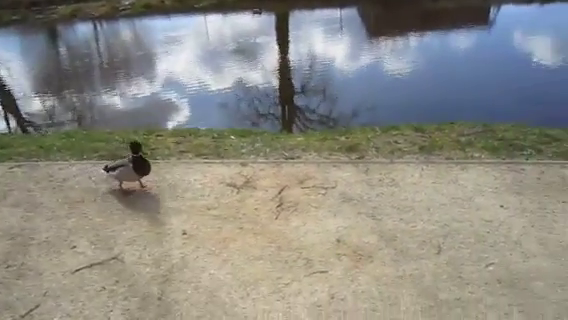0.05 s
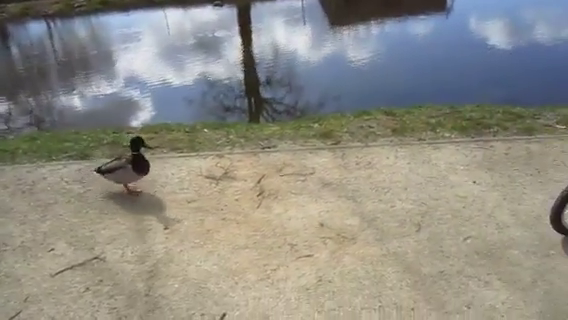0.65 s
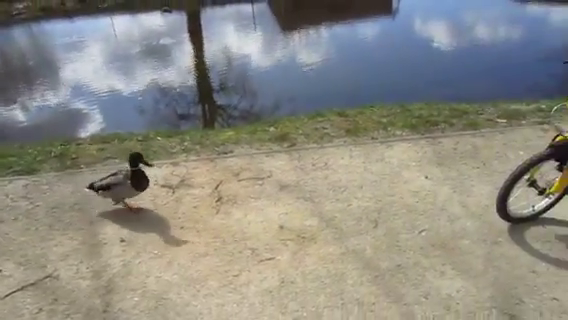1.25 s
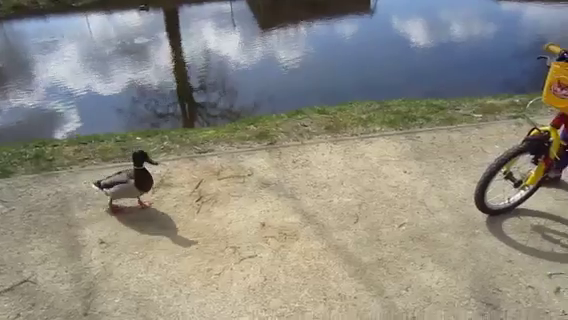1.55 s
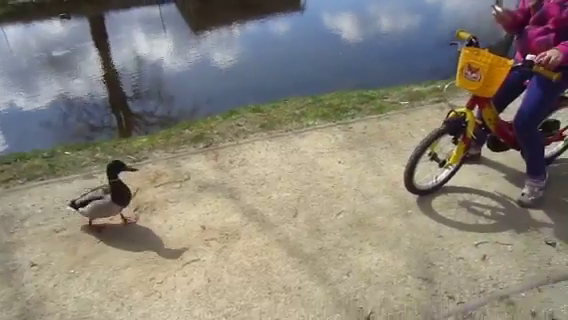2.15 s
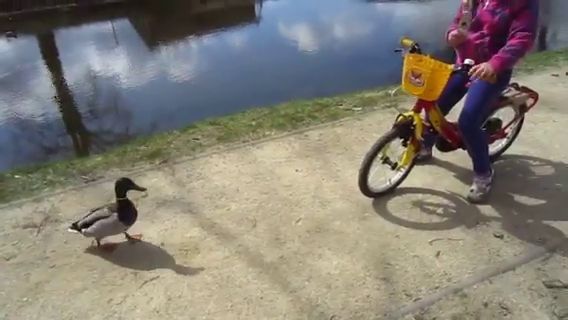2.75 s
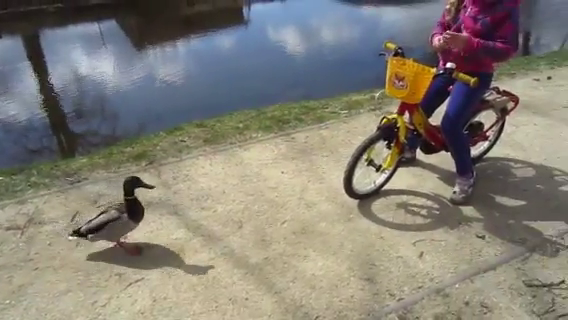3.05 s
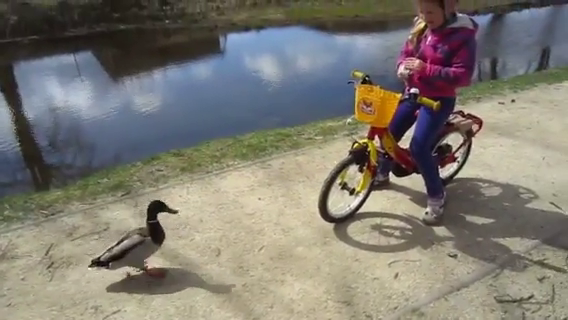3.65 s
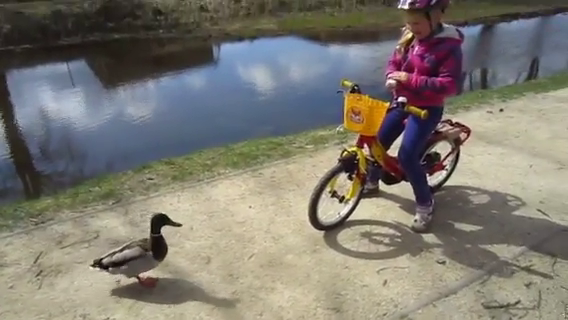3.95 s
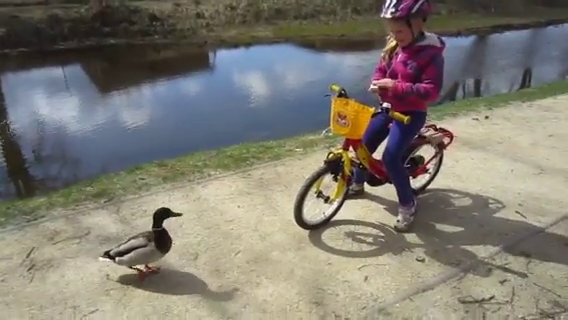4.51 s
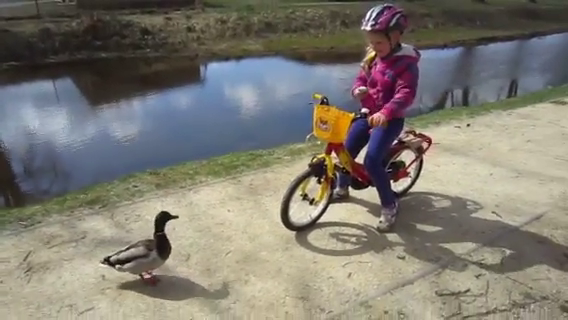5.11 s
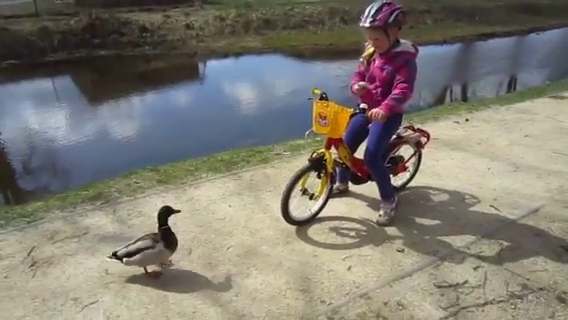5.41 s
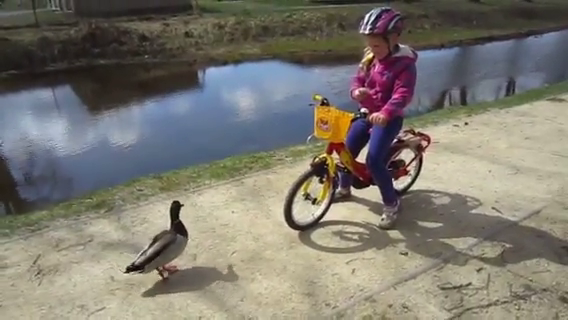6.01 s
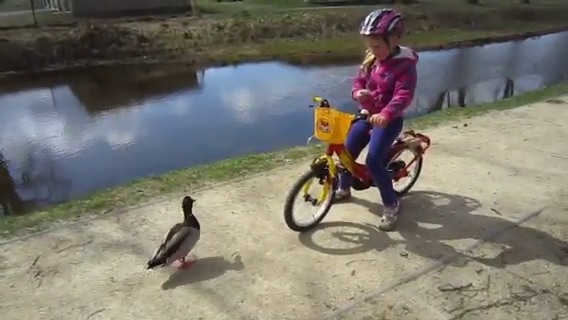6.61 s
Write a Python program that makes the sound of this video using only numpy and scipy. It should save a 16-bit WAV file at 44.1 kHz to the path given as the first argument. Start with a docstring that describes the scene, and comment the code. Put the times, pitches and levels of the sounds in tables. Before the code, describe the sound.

Outdoors beside a canal, loud, uneven gusts hit the microphone directly, rumbling and thumping with occasional cracks and brief hollow hoots. After a second or so, a nearby duck starts giving soft, short, raspy quacks, much quieter than the wind. Faint whistles and chirps come from distant birds. The quacks stop and the gusts briefly thin out before returning at the end.

```python
"""Mallard drake on a windy canal path

A drake gives short, soft, raspy quacks a few metres away: puffs of his syrinx ringing his windpipe.
Gusty wind buffets the microphone, far louder than he is: rumble, flutter, thumps, a few sharp cracks
and hollow hoots. Small birds whistle and chirp across the water, over a faint outdoor hush that
swells near the end."""
import sys
import numpy as np
from scipy import signal
from scipy.fft import rfft, irfft, next_fast_len
from scipy.io import wavfile
from scipy.ndimage import uniform_filter1d, map_coordinates

SR = 44100
rng = np.random.default_rng(int(sys.argv[2]) if len(sys.argv) > 2 else 0)


def to_wav(s):
    """Save 16-bit WAV."""
    ch = np.atleast_2d(s).T  # columns
    pcm = np.round(np.clip(ch, -1, 1) * 32767)  # PCM
    wavfile.write(sys.argv[1], SR, pcm.astype(np.int16))


N = 302967


def amp(db):
    """Decibels to gain."""
    return 10 ** (np.asarray(db) / 20)


def unit(x):
    """Scale to rms 1."""
    return x / np.sqrt(np.mean(x ** 2) + 1e-20)


def along(points, hz):
    """Read (freq_hz, value) points on a log frequency axis."""
    freqs, values = np.transpose(points)
    return np.interp(np.log(hz + 1), np.log(freqs), values)


def automation(rows):
    """One per-sample curve for each column after the time."""
    times, *columns = np.transpose(rows)
    return [np.interp(np.arange(N) / SR, times, column) for column in columns]


def wobble(rate_hz):
    """A smooth random curve with rate_hz knots a second."""
    return map_coordinates(rng.standard_normal(N // 8), [np.arange(N) * rate_hz / SR], mode="wrap")


def filtered(x, response):
    """Filter by a gain that is a function of frequency."""
    size = next_fast_len(N + SR // 2)
    return irfft(rfft(x, size) * response(np.fft.rfftfreq(size, 1 / SR)), size)[:N]


def coloured(x, spectrum):
    """EQ by a spectrum's shape; white input keeps its power."""
    return filtered(x, lambda hz: unit(amp(along(spectrum, hz))))


def noise(spectrum):
    """Coloured noise of rms 1."""
    return unit(coloured(rng.standard_normal(N), spectrum))


def add(track, start_s, sound):
    """Mix a sound into the track."""
    start = int(np.clip(round(start_s * SR), 0, N - 1))
    track[start:start + len(sound)] += sound[:N - start]


def eddies(spectrum, burst_db, steady_s):
    """Turbulence of one eddy size: it comes in bursts, while its power over steady_s stays near 1."""
    turbulence = coloured(rng.standard_normal(N) * amp(burst_db), spectrum)
    window = max(int(steady_s * SR), 1)
    power = uniform_filter1d(uniform_filter1d(turbulence ** 2, window), window)
    return turbulence / np.sqrt(np.abs(power) + 1e-12)


def gust(length_s, attack_s=.011, release_s=.012):
    """One gust's envelope: attack, hold, release."""
    t = np.arange(SR) / SR
    return np.minimum(t / attack_s, 1) * np.exp(-np.maximum(t - length_s, 0) / release_s)


# the light breeze between gusts: time_s, strength_db
BREEZE = [(0, -25.5), (1.4, -34), (2.2, -40), (3.25, -45.5), (4.5, -36.5), (5.05, -51), (6.05, -59),
          (6.3, -41.5), (6.87, -39)]
# gusts on the microphone: start_s, length_s, strength_db, rumble_offset_db, rasp_offset_db
GUSTS = [(0.01, 0.064, -24, 4.5, -12.5), (0.127, 0.053, -28, 0.5, -10), (0.222, 0.068, -19, 2.5, -13),
         (0.303, 0.13, -25, -4, -8.5), (0.438, 0.093, -20.5, 0.5, -13), (0.541, 0.326, -24, 1, -9.5),
         (0.875, 0.12, -26.5, -5, -5.5), (1.0, 0.19, -25.5, -6.5, -9.5), (1.215, 0.22, -31.5, 2.5, -15.5),
         (1.458, 0.12, -21, 2.5, -13), (1.575, 0.22, -24, 1.5, -15), (1.887, 0.087, -22.5, 3, -17),
         (2.016, 0.11, -23, -4, -17.5), (2.264, 0.015, -26, 1.5, -34), (2.34, 0.13, -21.5, -1, -20),
         (2.459, 0.1, -23, -6, -24.5), (2.619, 0.03, -15.5, -4.5, -21), (2.692, 0.16, -22, -3.5, -14.5),
         (2.858, 0.078, -28.5, -1.5, -10), (3.003, 0.15, -26.5, 1.5, -13), (3.346, 0.15, -27, -3, -22),
         (3.478, 0.026, -20, -0.5, -14), (3.535, 0.062, -22.5, -10.5, -21.5),
         (3.718, 0.13, -24.5, -0.5, -14), (3.864, 0.1, -29, -4, -21.5), (4.011, 0.069, -22.5, -2.5, -14.5),
         (4.101, 0.1, -28, -1, -28.5), (4.244, 0.11, -24, -0.5, -15.5), (4.39, 0.09, -29.5, 4.5, -20),
         (4.488, 0.072, -28.5, 10, -21), (4.59, 0.17, -33, 0, -15), (4.776, 0.025, -22, 5, -16),
         (4.836, 0.06, -34, 2, -34), (5.146, 0.15, -29, 1, -23.5), (5.341, 0.066, -38, 3.5, -38),
         (5.572, 0.045, -41, 6, -28), (5.722, 0.07, -31.5, 8, -15), (5.793, 0.1, -29.5, 8.5, -12),
         (5.928, 0.013, -29, 10.5, -14), (6.223, 0.021, -40, 13, -15), (6.351, 0.025, -24, 5, -20),
         (6.446, 0.099, -25, 4, -32), (6.632, 0.14, -26.5, 6, -19), (6.771, 0.08, -28.5, 1.5, -22)]
def airflow(usual_db=-47.5, usual_rumble_db=-37, rumble_growth=.6, breeze_rasp_offset_db=-19.5):
    """Levels in dB of large, middle and small eddies: gusts add their power to a wavering breeze."""
    breeze_db = automation(BREEZE)[0] + 4 * wobble(rate_hz=24)
    rumble_db = usual_rumble_db + rumble_growth * (breeze_db - usual_db)
    large, middle, small = amp([rumble_db, breeze_db, breeze_db + breeze_rasp_offset_db]) ** 2
    for start_s, length_s, db, rumble_offset_db, rasp_offset_db in GUSTS:
        add(large, start_s, (amp(db + rumble_offset_db) * gust(length_s, release_s=.013)) ** 2)
        add(middle, start_s, (amp(db) * gust(length_s)) ** 2)
        add(small, start_s, (amp(db + rasp_offset_db) * gust(length_s)) ** 2)
    return 10 * np.log10([large, middle, small])


# tone of the eddies, largest to finest: freq_hz, gain_db
RUMBLE_EQ = [(10, -23.5), (25, -7.5), (45, -3.5), (90, 0), (150, -1.5), (220, -7.5), (350, -25),
             (700, -86.5)]
FLUTTER_EQ = [(60, -34.5), (140, -2), (220, 3), (350, -0.5), (500, -7), (700, -17.5), (1000, -36),
              (2000, -79.5)]
RASP_EQ = [(250, -23.5), (550, 7), (800, 4.5), (1200, -4.5), (2000, -22.5), (3000, -41.5), (5000, -67.5)]
CRACKLE_EQ = [(700, -19.5), (1500, 10), (2400, -2), (3000, -9.5), (4000, -23), (6000, -39), (12000, -69)]
def wind(crowding_from_db=-41, crowding=.28, crackle_growth=3):
    """Eddies of three sizes come in partly shared bursts; hard gusts break them into a fine crackle."""
    large_db, middle_db, small_db = airflow()
    bursts = unit(wobble(60) + 1.51 * wobble(220))
    flaps = unit(bursts + .48 * wobble(260))
    # in a hard gust the flaps crowd together, so each stands out less
    flaps *= amp(-crowding * np.maximum(small_db - crowding_from_db, 0))
    rumble = amp(large_db) * eddies(RUMBLE_EQ, 2 * bursts, steady_s=.076)
    flutter = amp(middle_db) * eddies(FLUTTER_EQ, 5.9 * bursts, steady_s=.046)
    rasp = amp(small_db) * eddies(RASP_EQ, 7 * flaps, steady_s=.066)
    crackle_db = -49.5 + crackle_growth * (small_db + 35)
    crackle = amp(crackle_db) * eddies(CRACKLE_EQ, 11 * flaps, steady_s=.022)
    return rumble + flutter + rasp + crackle


# fader moves of the outdoor bed: time_s, hum_db, hiss_db
HUSH_LEVELS = [(0, -61.5, -80.5), (5.0, -64.5, -79), (5.6, -61.5, -76.5), (6.05, -56.5, -75),
               (6.65, -57, -71.5), (6.87, -60, -76)]
# tone of its two layers: freq_hz, gain_db
HUM_EQ = [(30, 8.5), (150, 8), (400, -3.5), (1000, 1.5), (2000, -5), (3000, -9.5), (4200, -16), (6000, -32),
          (12000, -50.5)]
HISS_EQ = [(1000, -8.5), (3500, 1), (6500, -0.5), (9000, -3.5), (12000, -6.5), (15000, -7)]
def hush():
    """Distant hum and a thin hiss of air in grass and branches."""
    hum_db, hiss_db = automation(HUSH_LEVELS)
    hum = amp(hum_db + .28 * wobble(20)) * noise(HUM_EQ)
    return hum + amp(hiss_db) * noise(HISS_EQ)


# the strongest single eddies on the microphone port: centre_s, thud_db, edge_db
THUMPS = [(0.043, -11.5, -42), (.27, -19.5, -21.5), (.381, -14, -23.5), (.443, -11.5, -16.5),
          (0.477, -19, -22), (.508, -14.5, -19.5), (0.583, -18, -18.5), (.713, -11, -16), (.804, -17, -20),
          (0.856, -10.5, -26), (.936, -8.5, -16.5), (1.183, -14, -25.5), (1.469, -18.5, -47.5),
          (1.549, -20, -26.5), (1.794, -7.5, -22), (2.029, -6, -24.5), (2.046, -11, -24),
          (2.096, -7, -34.5), (2.354, -8, -37), (2.438, -6, -37), (2.442, -4, -22), (2.494, -13, -39.5),
          (2.63, -9, -44), (2.695, -8, -29), (2.768, -13, -22.5), (2.846, -12, -27.5), (2.985, -29, -34),
          (3.097, -6.5, -26.5), (3.5, -9.5, -28), (3.766, -13.5, -41), (3.83, -10, -35.5),
          (4.05, -10.5, -25), (4.071, -13.5, -31.5), (4.253, -17.5, -33), (4.279, -10, -31),
          (4.4, -14, -36.5), (4.723, -16.5, -36), (4.783, -3.5, -19.5), (5.263, -14.5, -40),
          (5.832, -23.5, -30.5), (5.934, -15.5, -31.5), (6.362, -15.5, -40), (6.65, -13, -44),
          (6.71, -9.5, -38.5), (6.741, -11, -40)]
# tone of their sharp edge: freq_hz, gain_db
EDGE_EQ = [(300, -24.5), (650, 1.5), (1000, 6.5), (1500, -5), (2600, -15.5), (4000, -33), (6000, -51.5),
           (12000, -79.5)]
def thumps(base_hz=535, width_cycles=.5, db_per_octave=45, edge_s=.0012):
    """An eddy crossing the port pushes, then pulls; a fast one is higher and tears off a sharp edge."""
    thuds, edges = np.zeros(N), np.zeros(N)
    t = np.arange(-SR // 50, SR // 50) / SR
    for centre_s, thud_db, edge_db in THUMPS:
        octaves = (edge_db - thud_db) / db_per_octave + rng.normal(0, .17)
        cycles = t * base_hz * 2 ** octaves
        push_pull = np.sin(2 * np.pi * cycles) * np.exp(-(cycles / width_cycles) ** 2)
        add(thuds, centre_s + t[0], rng.choice([-1, 1]) * amp(thud_db) * push_pull)
        add(edges, centre_s + t[0], amp(edge_db) * np.exp(-(t / edge_s) ** 2))
    return thuds + edges * eddies(EDGE_EQ, burst_db=0, steady_s=.0074)


# wind cracks: start_s, peak_db
CRACKS = [(.05, -33.5), (0.508, -28.5), (0.631, -31), (.637, -34), (.943, -34.5), (1.794, -33),
          (2.443, -28), (4.782, -44.5)]
# their bright tone: freq_hz, gain_db
CRACK_EQ = [(300, -14.5), (1500, 0), (4000, 2), (8000, -11.5), (14000, -18), (16000, -29.5)]
def cracks():
    """The hardest blows overload the capsule for an instant, each heard as one bright spike."""
    spikes, unit_spike = np.zeros(N), np.zeros(N)
    for start_s, peak_db in CRACKS:
        add(spikes, start_s, amp([peak_db]))
    unit_spike[N // 2] = 1
    return coloured(spikes, CRACK_EQ) / coloured(unit_spike, CRACK_EQ).max()


def tone(hz, waver):
    """A sine of rms 1 whose pitch strays by the fraction waver; a deep waver makes it hoarse."""
    drift = unit(uniform_filter1d(rng.standard_normal(SR // 2), size=90))[:len(hz)]
    return np.sqrt(2) * np.sin(2 * np.pi * np.cumsum(hz * (1 + waver * drift)) / SR)


# one bird's repeated long whistle: start_s, length_s, top_pitch_hz, level_db
WHISTLES = [(0.619, .23, 3120, -65.5), (1.877, 0.28, 3047, -58), (2.759, .3, 3063, -67),
            (3.776, 0.24, 3000, -63), (5.941, .26, 3040, -60.5)]
# contour of each whistle: length_fraction, pitch_ratio, gain_db
WHISTLE_CONTOUR = [(0, .87, -11), (.25, .95, -8), (.42, .988, -1), (.62, 1, 0), (.82, .99, 0),
                   (.93, .978, -4), (1, .91, -14)]
def whistler(upper_ratio=1.165, upper_db=-17, hoarseness=.066):
    """A whistle starts hoarse, slides up and clears; the syrinx's other side adds a weak higher note."""
    out = np.zeros(N)
    fractions, pitch_ratios, gains_db = np.transpose(WHISTLE_CONTOUR)
    for start_s, length_s, top_pitch_hz, level_db in WHISTLES:
        progress = np.linspace(0, 1, int(length_s * SR))
        hz = top_pitch_hz * np.interp(progress, fractions, pitch_ratios)
        waver = .0032 + hoarseness * np.clip(1 - progress / .56, 0, 1)
        voices = tone(hz, waver) + amp(upper_db) * tone(hz * upper_ratio, waver)
        add(out, start_s, amp(level_db + np.interp(progress, fractions, gains_db)) * voices)
    return out


# small birds' chirps: start_s, length_s, start_hz, middle_hz, end_hz, level_db
CHIRPS = [(1.339, .11, 4520, 4100, 4100, -72), (1.432, 0.064, 3310, 3700, 3330, -70),
          (1.686, 0.039, 3320, 3670, 3950, -68), (1.893, 0.066, 3520, 3870, 4130, -65.5),
          (3.87, 0.028, 5900, 6300, 6400, -69.5), (3.998, 0.035, 6330, 6020, 6000, -71),
          (4.005, 0.017, 5100, 4780, 4700, -68.5), (4.168, 0.036, 5950, 6350, 6400, -70),
          (4.278, 0.029, 4820, 4750, 4850, -66.5), (4.531, .055, 3210, 3780, 4380, -67.5),
          (4.553, 0.084, 5250, 5150, 5200, -74), (4.663, 0.023, 3680, 4200, 4420, -69),
          (5.261, 0.069, 3550, 3400, 2800, -73), (5.332, 0.072, 3700, 3830, 3900, -68.5),
          (6.541, 0.036, 2960, 3400, 3020, -60)]
def chirpers():
    """Small birds sing short glides, each a smooth arc through three pitches."""
    out = np.zeros(N)
    for start_s, length_s, *pitches_hz, level_db in CHIRPS:
        progress = np.linspace(0, 1, int(length_s * SR))
        arc_hz = np.polyval(np.polyfit([0, .5, 1], pitches_hz, 2), progress)
        add(out, start_s, amp(level_db) * np.sin(np.pi * progress) * tone(arc_hz, waver=.012))
    return out


# the drake's quacks: start_s, length_s, puff_rate_hz, level_db
QUACKS = [(1.355, .065, 92, -64), (1.64, .06, 92, -62), (2.301, .055, 88, -56), (2.551, .056, 92, -57),
          (3.325, .065, 90, -64), (3.572, .055, 92, -62), (4.122, .06, 92, -60), (4.366, .056, 95, -56),
          (4.62, .052, 85, -55.5), (5.475, .05, 90, -66)]
# tone of his syrinx and bill: freq_hz, gain_db
BILL_EQ = [(500, -20), (1100, -3), (1850, 0), (2600, 0), (3400, -5), (4100, -16), (5600, -17), (8000, -32)]
def drake(windpipe_hz=372, reflection=.65, puff_rise_s=.0012, jitter_s=.00017):
    """Each quack is a handful of slow, noisy puffs of the syrinx ringing the long windpipe."""
    puffs, t = np.zeros(N), np.arange(SR // 50) / SR
    for start_s, length_s, rate_hz, level_db in QUACKS:
        for onset_s in np.arange(.5 / rate_hz, length_s, 1 / rate_hz):
            puff = rng.standard_normal(len(t)) * t * np.exp(-t / puff_rise_s)
            puff *= np.sqrt(SR / rate_hz) / np.linalg.norm(puff)  # rms 1 over one period
            swell = np.sin(np.pi * onset_s / length_s) * amp(level_db + rng.normal(0, 1))
            add(puffs, start_s + onset_s + rng.normal(0, jitter_s), swell * puff)

    def windpipe(hz):
        """Closed at one end, reflecting at the open one, it rings at odd multiples of its lowest mode."""
        round_trip = reflection * np.exp(-1j * np.pi * hz / windpipe_hz)
        return np.sqrt(1 - reflection ** 2) / (1 + round_trip)

    return coloured(filtered(puffs, windpipe), BILL_EQ)


# hollow hoots of the port: start_s, length_s, level_db
HOOTS = [(3.348, .07, -37), (3.52, .1, -31), (4.848, 0.06, -40)]
# the port's resonance: freq_hz, gain_db
HOOT_EQ = [(250, -29), (400, -1.5), (480, 0), (600, -10.5), (900, -42), (2000, -79)]
def hoots():
    """Air skimming across the port rings it as a narrow, hollow band of noise."""
    swell = np.zeros(N)
    for start_s, length_s, level_db in HOOTS:
        add(swell, start_s, amp(level_db) * gust(length_s))
    return swell * eddies(HOOT_EQ, burst_db=0, steady_s=.03)


# reverb decay of the far bank: freq_hz, t60_s
BANK_DECAY = [(3000, .45), (8000, .2)]
def bank_reverb(send):
    """Trees and the far bank scatter a thin tail whose highs die first."""
    hz, t, bins = signal.stft(rng.standard_normal(SR // 2), SR, nperseg=256)
    decay = amp(-60 * t / along(BANK_DECAY, hz)[:, None])
    tail = signal.istft(bins * decay, SR, nperseg=256)[1]
    return signal.fftconvolve(send, tail / np.linalg.norm(tail))[:N]


def scene():
    """The near drake is almost dry, the far birds wetter; the wind is on the microphone itself."""
    quacks, whistles, chirps = drake(), whistler(), chirpers()
    reverb = bank_reverb(amp(-15) * quacks + amp(-9) * whistles + amp(-5) * chirps)
    birds = quacks + whistles + chirps + reverb
    return (birds + hush() + wind() + thumps() + cracks() + hoots())[None]


def record(dry, band_limit_hz=15300):
    """The hand-held camera keeps nothing above its band limit."""
    return filtered(dry[0], lambda hz: hz < band_limit_hz)[None]


dry = scene()
out = record(dry)
to_wav(out)
```